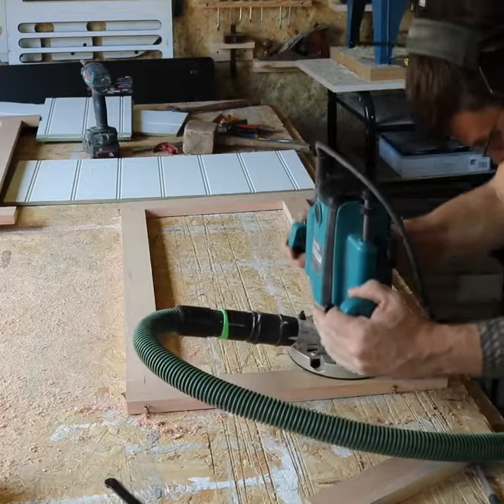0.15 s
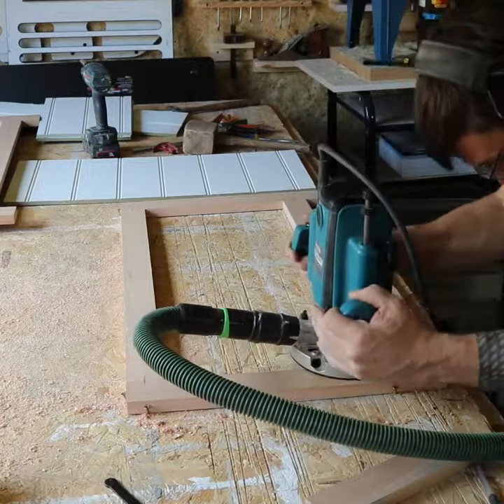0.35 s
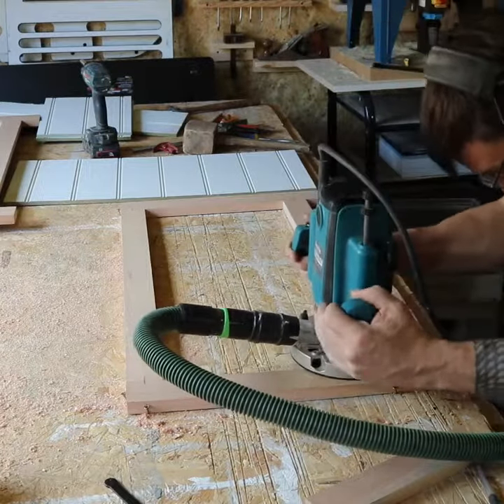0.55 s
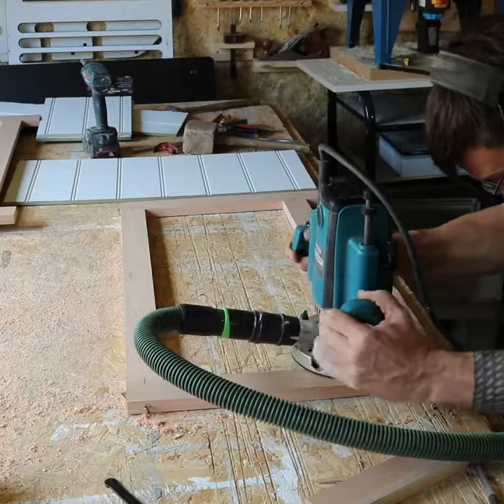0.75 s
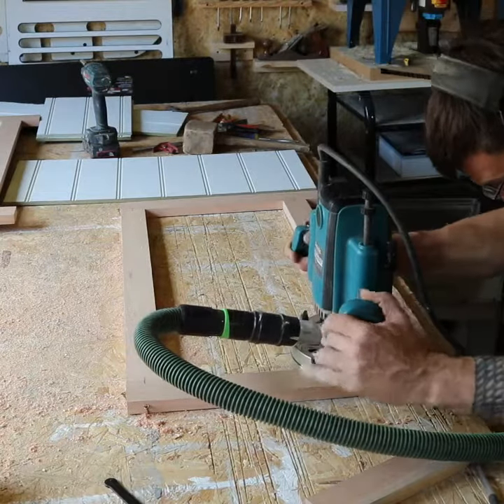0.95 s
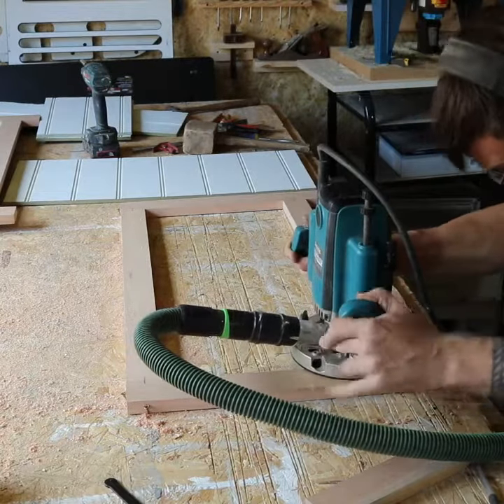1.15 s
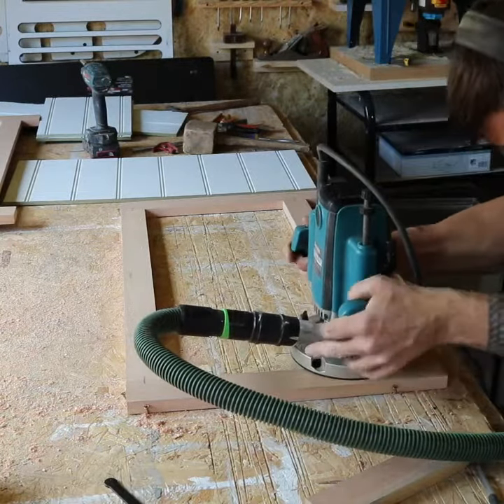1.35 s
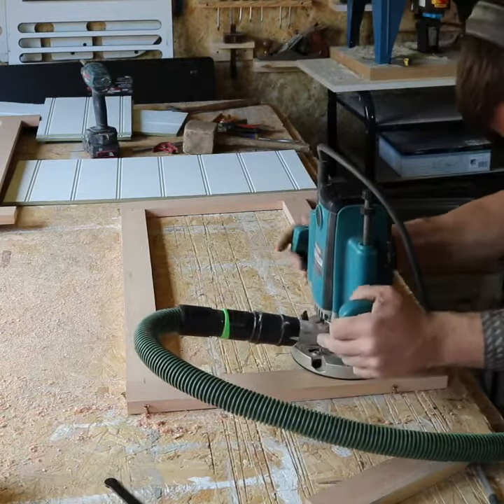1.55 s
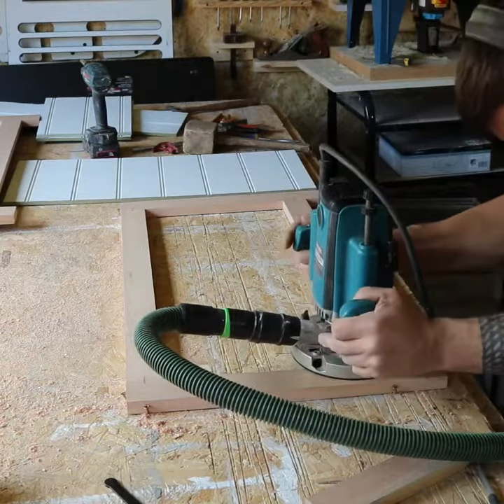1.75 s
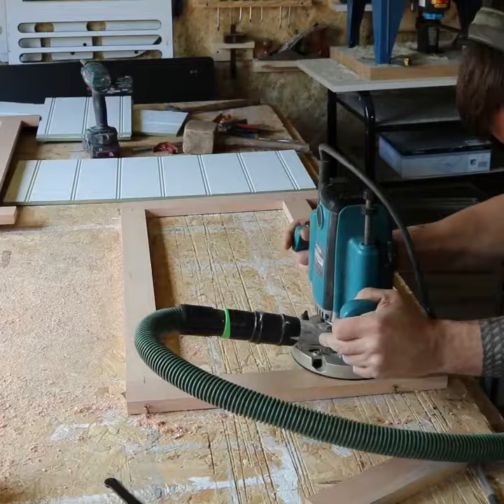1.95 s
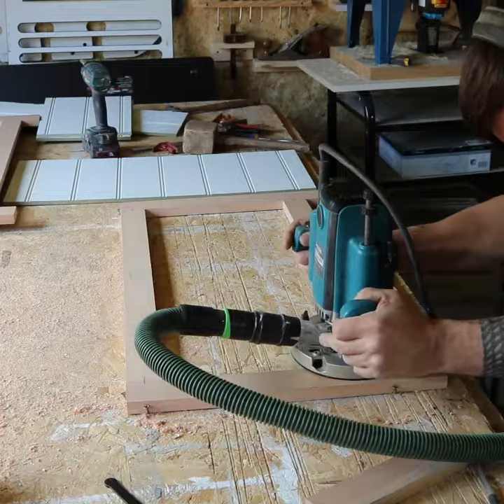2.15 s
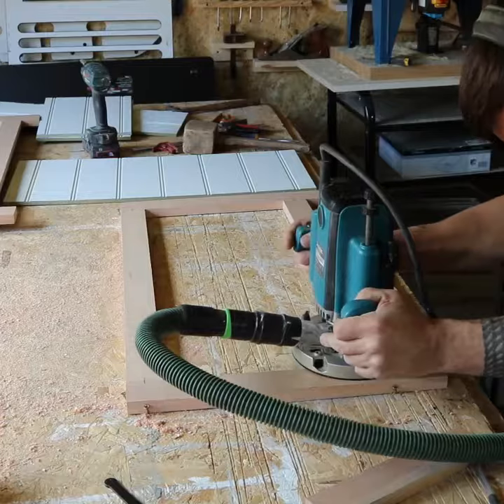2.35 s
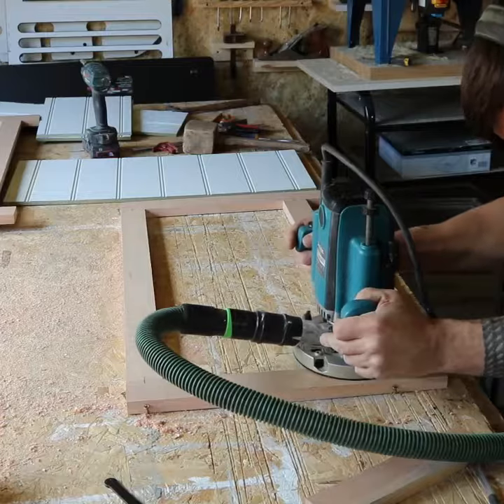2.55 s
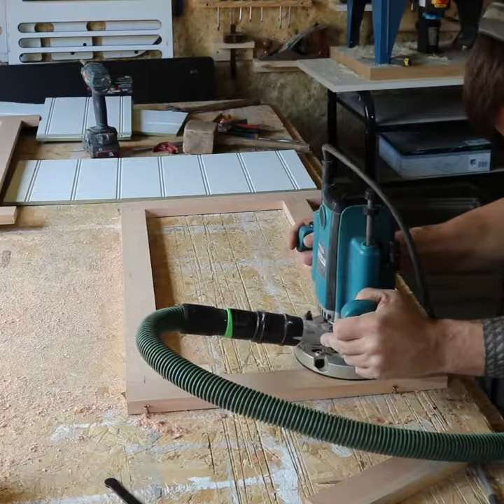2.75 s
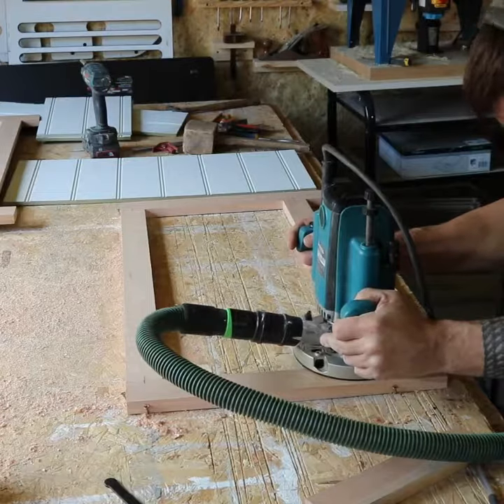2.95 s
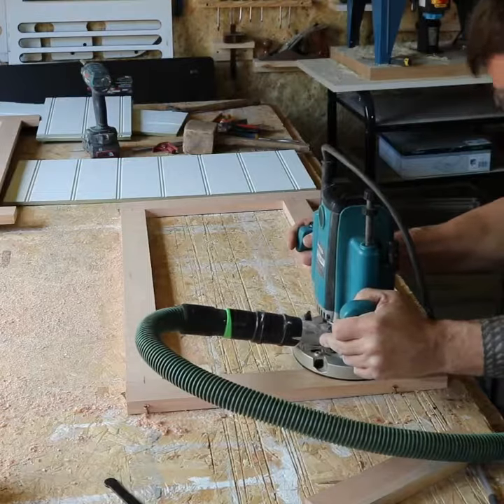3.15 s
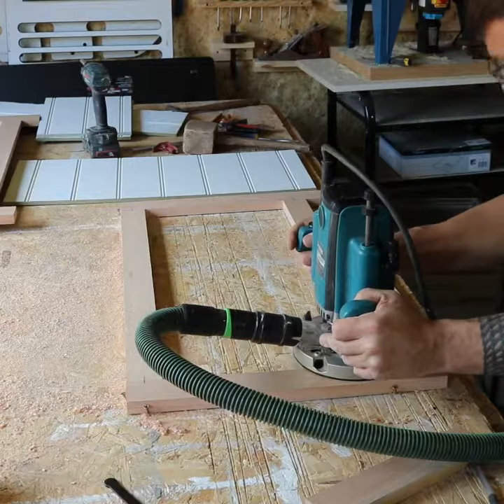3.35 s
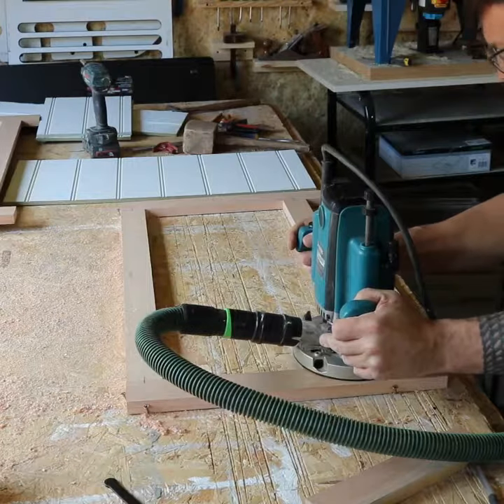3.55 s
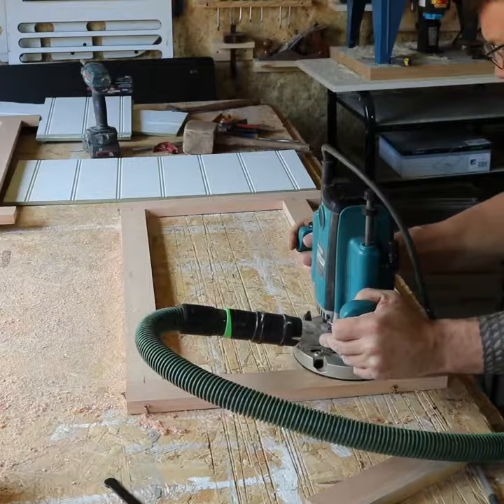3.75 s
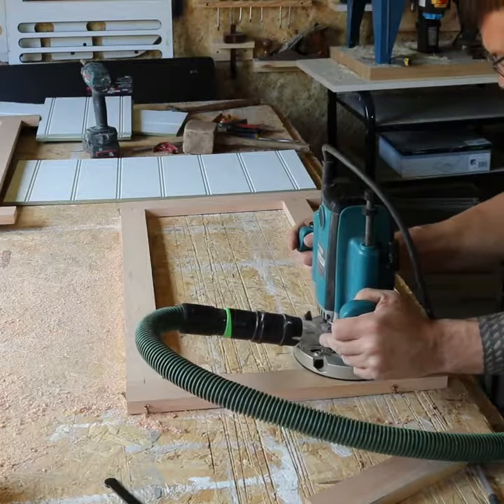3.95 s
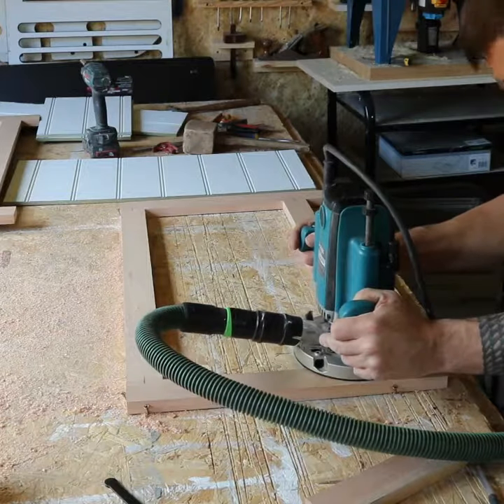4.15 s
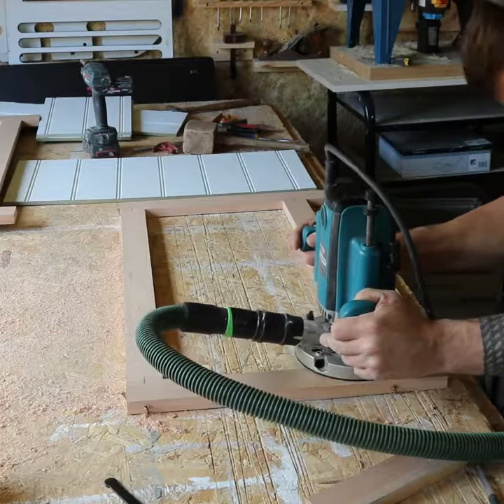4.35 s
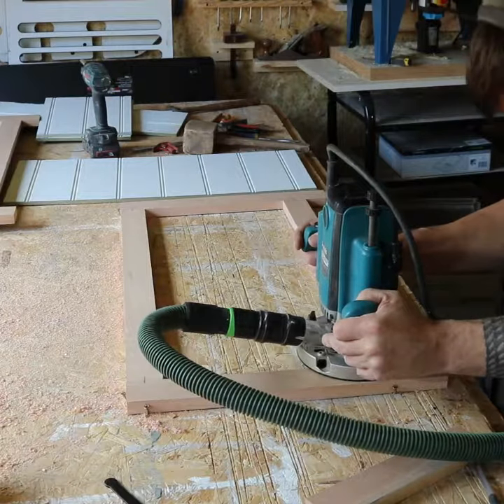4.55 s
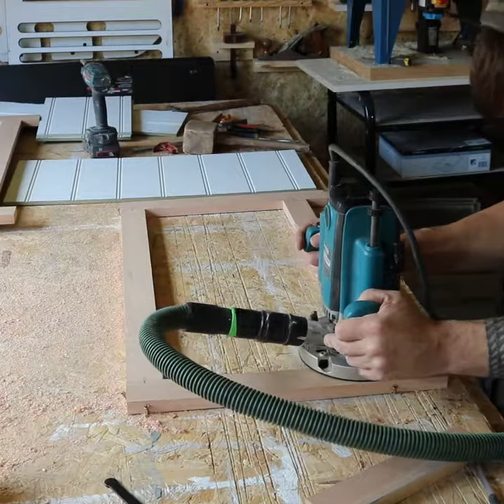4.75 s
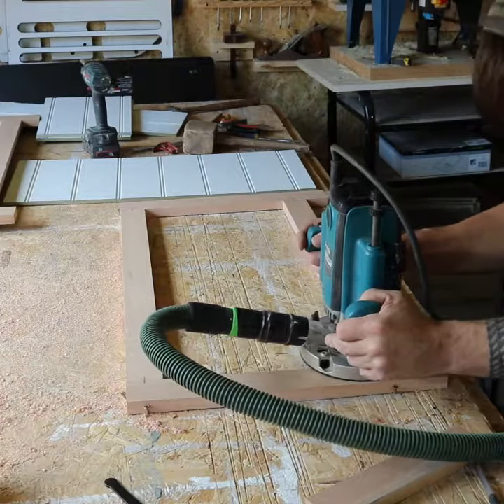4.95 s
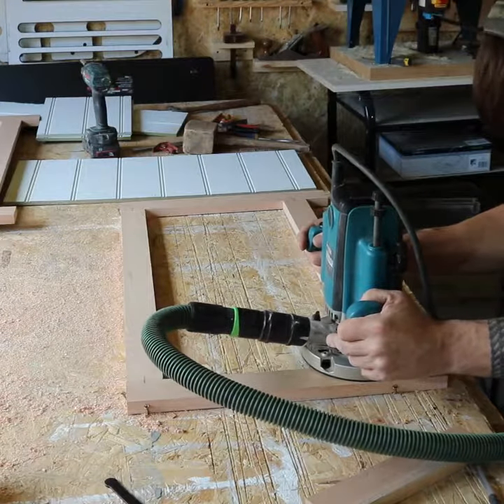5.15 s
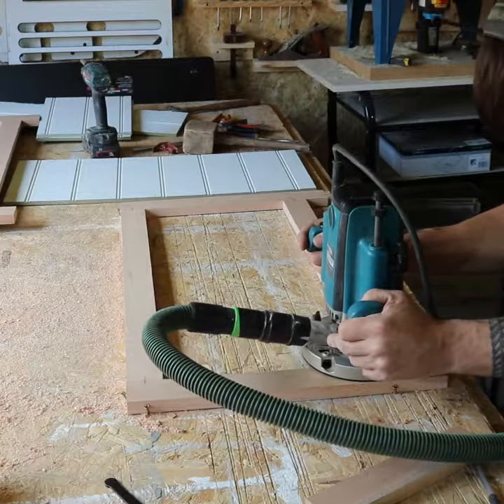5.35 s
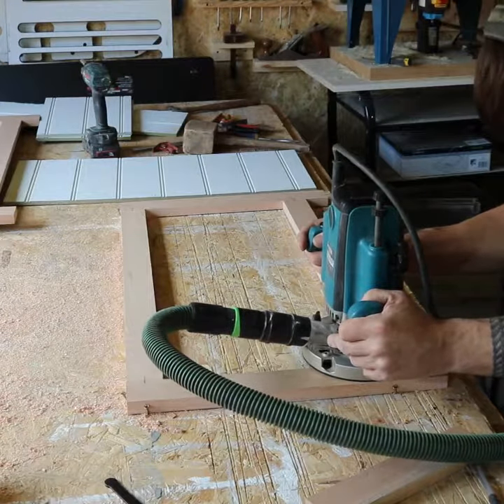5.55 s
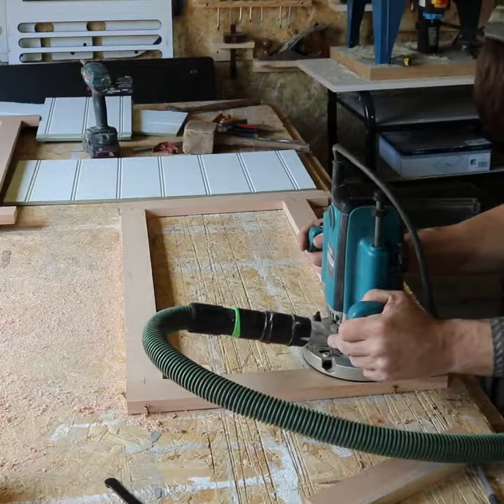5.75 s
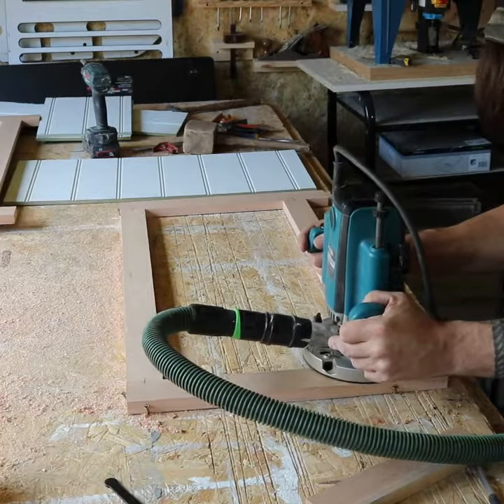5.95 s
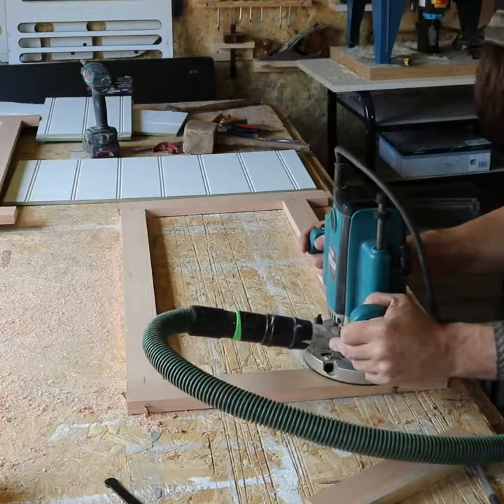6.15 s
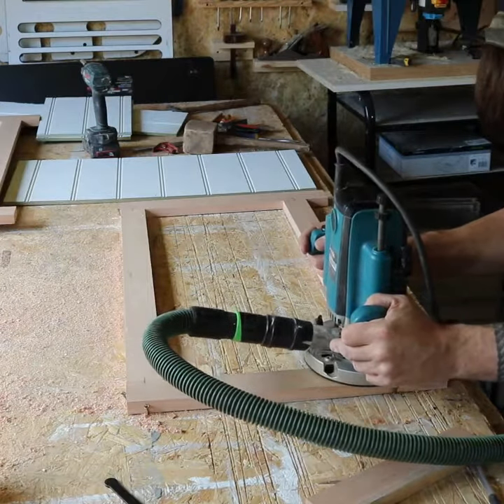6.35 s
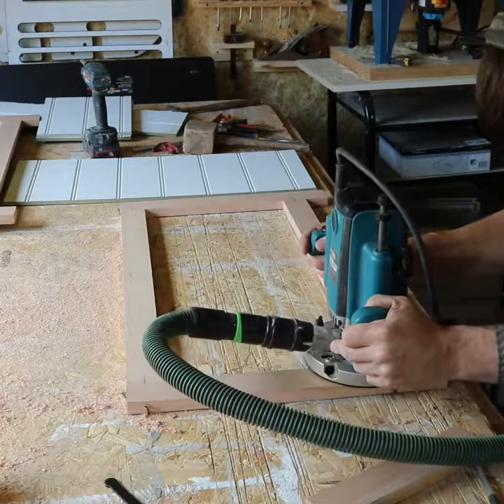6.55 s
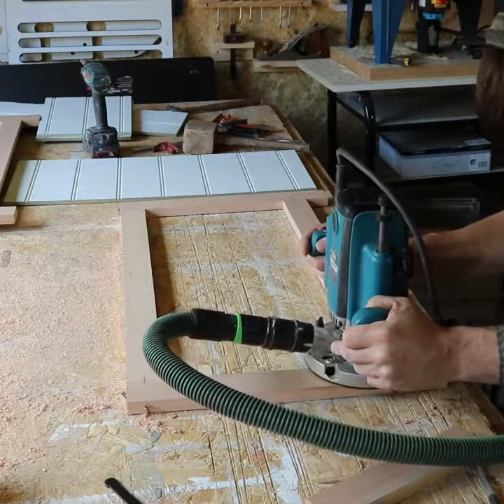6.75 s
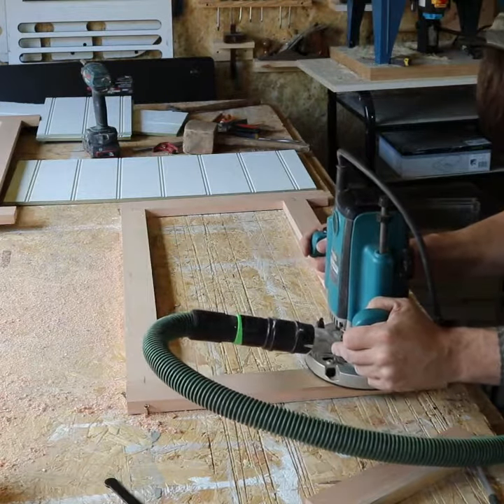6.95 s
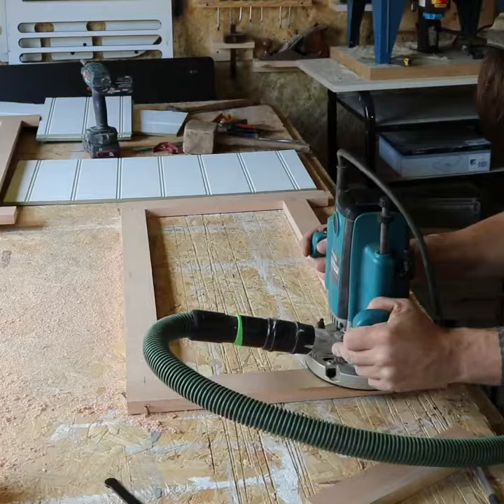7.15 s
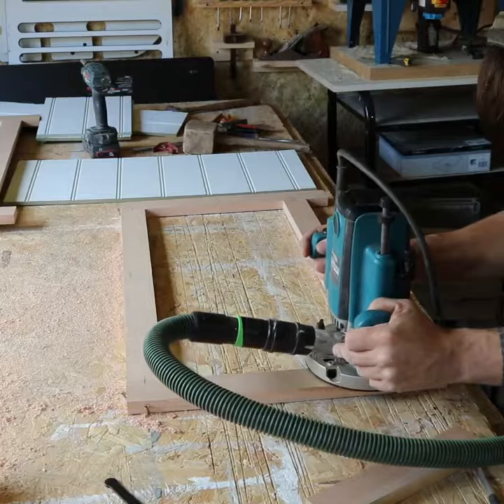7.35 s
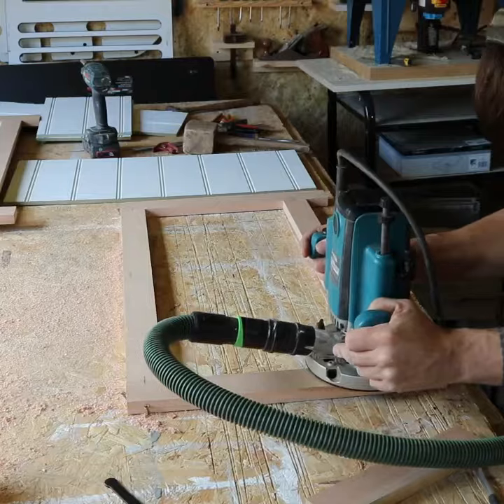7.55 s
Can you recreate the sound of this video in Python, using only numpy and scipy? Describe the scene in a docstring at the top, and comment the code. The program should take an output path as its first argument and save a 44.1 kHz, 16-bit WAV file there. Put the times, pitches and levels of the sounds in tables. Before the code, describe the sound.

A few scrapes and knocks on wood, then a router starts, spins up to a loud high whine and cuts wood.

```python
"""Scrapes and knocks come first: a plunge router is slid into place on a wooden frame in a small workshop.
Switched on, the stalled motor buzzes with the mains, then its fan siren sweeps upward until the shaft
settles near 400 turns a second. Air rushes loudly through the housing, and shaft harmonics swell and
fade as the cutter works along the wood. Behind it, a dust extractor on the hose winds up."""
import sys
import numpy as np
from scipy import signal
from scipy.fft import rfft, irfft
from scipy.io import wavfile

SR = 44100
rng = np.random.default_rng(int(sys.argv[2]) if len(sys.argv) > 2 else 0)


def dump(signal):
    """Clip the signal to [-1, 1] and save it as 16-bit WAV at the path in sys.argv[1]."""
    limited = np.clip(np.atleast_2d(signal).T, -1, 1)
    pcm = np.round(limited * 32767).astype(np.int16)
    wavfile.write(sys.argv[1], SR, pcm)


N = 338688
TIME, HZ = np.arange(N) / SR, np.fft.rfftfreq(N, 1 / SR)
SWITCH_ON_S, MAINS_PULSE_HZ = 1.776, 100


def amp(db):
    """Decibels to gain."""
    return 10 ** (np.asarray(db) / 20)


def unit(x):
    """Scales to rms 1."""
    return x / np.sqrt(np.mean(x ** 2) + 1e-20)


def curve(points, hz=HZ):
    """Joins (f, value) points by straight lines over log frequency."""
    f, value = np.transpose(points)
    return np.interp(np.log(hz + 1), np.log(f + 1), value)


def bells(resonances, at=HZ):
    """Bell EQ in dB from (f, width, boost) resonances."""
    return sum(db / (1 + (2 * (at - hz) / width) ** 2) for hz, width, db in resonances)


def band(low_hz, high_hz):
    """Gain of a steep band-pass."""
    return 1 / np.sqrt((1 + (low_hz / (HZ + 1)) ** 12) * (1 + (HZ / high_hz) ** 12))


def noise(gain):
    """Noise of rms 1, coloured by a gain over frequency."""
    return unit(irfft(rfft(rng.standard_normal(N)) * gain, N))


def drift(rate_hz):
    """Random wander of rms 1, mostly slower than rate_hz."""
    return noise(1 / (1 + (HZ / rate_hz) ** 2))


def held(start, end, attack_s, release_s):
    """Envelope that rises from the start and dies away after the end."""
    attack = 1 - np.exp(-np.maximum(TIME - start, 0) / attack_s)
    return attack * np.exp(-np.maximum(TIME - end, 0) / release_s)


# reverb decay of the shop: f/Hz, t60/s
ROOM_DECAY = [(100, 0.31), (400, 0.25), (1500, 0.26), (4000, 0.22), (10000, 0.2)]
def workshop(dry, wet_db):
    """Direct sound plus dense reflections; the treble dies first."""
    taps = rng.standard_normal(SR // 2) * (np.arange(SR // 2) > .003 * SR)
    hz, t, spectra = signal.stft(taps, SR, nperseg=256)
    tail = signal.istft(spectra * amp(-60 * t / curve(ROOM_DECAY, hz)[:, None]), SR, nperseg=256)[1]
    wet = signal.fftconvolve(dry, tail / np.linalg.norm(tail))[:N]
    return (dry + amp(wet_db) * wet) / np.hypot(1, amp(wet_db))


# EQ of the background bed: f/Hz, level/dB
ROOM_EQ = [(15, -40), (40, -40), (100, -2), (180, -0.5), (350, -3.5), (800, -8.5), (2000, -13), (5000, -18),
           (10000, -22), (16000, -30)]
def room_tone(mains):
    """A quiet, dark bed of noise with a trace of mains hum."""
    return amp(-53.5) * noise(amp(curve(ROOM_EQ)) * band(74, 20000)) + amp(-69.5) * mains


def extractor(start_s=2.2, wind_up_s=1.08, top_hz=637, level_db=-46):
    """The suction motor winds up slowly: a faint, wavering note that grows with its speed."""
    share = np.tanh(np.maximum(TIME - start_s, 0) / wind_up_s)
    phase = 2 * np.pi * np.cumsum(top_hz * share) / SR + 0.68 * drift(15)
    return np.sqrt(2) * share * amp(level_db + 3.1 * drift(12)) * np.cos(phase)


# EQs of the scrape and of its hiss: f/Hz, level/dB
SCRAPE_EQ = [(25, -35), (60, -27), (160, -2), (320, -2.5), (600, -2.5), (1200, -4.5), (2400, -3.5),
             (2900, -10.5), (3500, -9), (4200, -16), (7000, -40)]
HISS_EQ = [(1500, -8.5), (3800, -1), (6500, -6), (10000, -10.5), (12000, -17), (16000, -26)]
# shoves over the wood: centre t/s, half length/s, then relative level/dB of scrape, hiss and rumble
SHOVES = [(.005, 0.041, -38.5, -43, -56), (0.099, 0.067, -35, -47.5, -40.5), (0.208, 0.12, -40.5, -50, -46),
          (0.314, .05, -52, -50, -44), (.45, 0.15, -47, -60, -60), (0.676, 0.07, -60, -55.5, -60),
          (.75, .06, -52, -62, -66), (1.08, 0.32, -72, -66, -61), (1.334, 0.11, -59, -59.5, -70),
          (1.47, 0.058, -43, -58, -66), (1.562, 0.052, -37, -40, -66), (1.645, 0.049, -31.5, -31, -65),
          (1.72, 0.057, -38, -47, -63)]
def slides(grain_db=1.5):
    """The base plate catches and slips on the grain and shakes the bench; each shove swells and fades."""
    power = sum(np.outer(amp(dbs), np.exp(-((TIME - s) / half) ** 2)) ** 2 for s, half, *dbs in SHOVES)
    rub, hiss, rumble = np.sqrt(power)
    grip = unit(amp(grain_db * drift(150)))
    scrape = rub * noise(amp(curve(SCRAPE_EQ))) + amp(4) * hiss * noise(amp(curve(HISS_EQ)))
    judder = noise(band(45, 400) / (1 + ((HZ - 78) / 14) ** 2))
    return grip * scrape + rumble * judder


# EQ shared by all knocks: f/Hz, level/dB
KNOCK_EQ = [(30, -8), (75, -13.5), (130, -8.5), (290, 0.5), (800, 2.5), (1800, 0.5), (3000, 3), (4600, -4),
            (6000, -12), (10400, -14.5), (11500, -27), (16000, -33)]
# modes of tool and bench: f/Hz, nominal ring/s, boost/dB
BODY_MODES = [(76, .3, -1), (150, .2, 9.5), (296, 0.17, 1), (574, 0.13, 3), (616, 0.17, 0),
              (2520, 0.018, 1.5), (3250, 0.01, -0.5), (3800, .025, 2), (4550, .02, -2)]
# hits of base, lock and switch: t/s, relative level/dB, bass/dB, treble/dB, contact/s, ring f/Hz
HITS = [(0.264, -23, -11, 3, 0.0013, 4400), (0.2676, -23, 6.5, 6.5, 0.003, 280),
        (.418, -40, 9, -7, 0.0076, 1400), (0.4908, -34.5, 5, -30, 0.0051, 835),
        (.708, -41.5, 8, -11, 0.0067, 1500), (0.785, -47, 15, 5, 0.0038, 503),
        (1.178, -54, 12, 5, 0.0052, 250), (1.418, -28.5, 1, -15, 0.0046, 1100),
        (1.441, -38.5, 7, -23, .008, 2700), (1.714, -21.5, -20, 1, 0.0015, 2980),
        (1.719, -38, -6, 2, 0.0055, 3000), (1.775, -29, 1, -2, 0.0032, 2200)]
def knocks(bass_hz=600, treble_hz=3400, ring_db=6, ring_width=0.12):
    """Each contact is a short rattle that rings the struck part, the tool and the bench."""
    blows = np.zeros(N)
    t, hz = np.arange(4096) / SR, np.fft.rfftfreq(4096, 1 / SR)
    for s, db, bass_db, treble_db, contact_s, ring_hz in HITS:
        shelves = bass_db / (1 + (hz / bass_hz) ** 2) + treble_db / (1 + (treble_hz / (hz + 1)) ** 4)
        ring = ring_db / (1 + ((hz / ring_hz - 1) / ring_width) ** 2)
        pressure = t / contact_s * np.exp(1 - t / contact_s)
        rattle = irfft(rfft(rng.standard_normal(len(t))) * amp(shelves + ring))
        blows[round(s * SR):][:len(t)] += amp(db) * pressure * rattle
    body_db = curve(KNOCK_EQ) + bells([(f, 6 / ring_s, db) for f, ring_s, db in BODY_MODES])
    log_gain = np.log(unit(amp(body_db)))
    # minimum phase, so the ring follows the blow
    phase = -signal.hilbert(np.r_[log_gain, log_gain[-2:0:-1]]).imag[:len(HZ)]
    ringing = irfft(rfft(blows) * np.exp(log_gain + 1j * phase), N)
    return amp(2.5) * workshop(ringing, wet_db=-1.0)


# shaft speed, running up from rest and sagging in heavy cuts: t/s, speed/(turns/s)
SHAFT_SPEED = [(1.775, 2), (2.05, 110), (2.19, 165), (2.3, 240), (2.4, 279), (2.7, 344), (2.82, 356),
               (3.1, 372), (3.35, 386.5), (3.7, 395.3), (4.3, 403.7), (4.9, 407.6), (5.33, 397),
               (5.8, 398.4), (7, 395.8), (7.4, 388), (7.68, 391)]
# current surges of the run-up: start t/s, end t/s, level/dB, attack/s, release/s
INRUSH = [(1.778, 2.045, 0, 0.014, 0.05), (2.146, 2.35, -6, 0.058, 0.05)]
def motor(running_db=-30):
    """Speed, shaft angle and relative current: the controls for the router's layers."""
    speed = np.interp(TIME, *np.transpose(SHAFT_SPEED))
    angle = 2 * np.pi * np.cumsum(speed * (1 + 0.00029 * drift(9.8))) / SR
    surges = sum(amp(db) * held(start, end, attack, release) for start, end, db, attack, release in INRUSH)
    return speed, angle, amp(running_db) + surges


# partials of the buzz: multiple of the mains pulse, relative level/dB
BUZZ_PARTIALS = [(2, -19.5), (3, -0.5), (4, 1.5), (5, -7), (6, -3), (9, -7), (12, -1)]
def motor_buzz(current, mains, buzz_db=-30, hum_db=-44, fade_db_per_s=15.5):
    """The starting current makes the iron buzz and the brushes rasp, over a fading hum."""
    buzz = unit(sum(amp(db) * np.cos(2 * np.pi * (round(k) * MAINS_PULSE_HZ * TIME + rng.random()))
                    for k, db in BUZZ_PARTIALS))
    brushes = amp(3) * noise(1 / (1 + ((HZ - 2150) / 450) ** 2)) * (1 + 0.35 * mains)
    shudder = amp(-12.5) * noise(band(84, 400))
    hum = amp(hum_db - fade_db_per_s * np.maximum(TIME - SWITCH_ON_S, 0)) * mains
    return amp(buzz_db) * current * (buzz + brushes + shudder) + hum


# level ride along the siren's sweep: f/Hz, level/dB
SIREN_RIDE = [(300, -49), (800, -28.5), (1400, -32.5), (1620, -22), (1900, -16.5), (2130, -18),
              (2500, -21.5), (3800, -21.5), (4460, -37), (6200, -76)]
# grit while the rotor is slow: speed/(turns/s), share of rasp
SIREN_GRIT = [(140, .33), (180, 0)]
def fan_siren(speed, angle, mains, blades=16, throb=0.41, smear_rad=0.72, unevenness=0.46):
    """The fan blades sing a rising note, harsh at first, that throbs with the mains."""
    blade_phase = blades * angle + smear_rad * drift(125)
    rasp = np.cos(2 * blade_phase - .7 * drift(130)) + amp(-3) * np.cos(14 * angle + 1.5 * drift(130))
    siren = np.sqrt(2) * (np.cos(blade_phase) + np.interp(speed, *np.transpose(SIREN_GRIT)) * rasp)
    siren *= 1 + unevenness * np.cos(angle + drift(40))  # the blades are not quite alike
    siren *= amp(curve(SIREN_RIDE, blades * speed))
    return workshop(siren, wet_db=-5.0) * (1 + throb * mains)


# passes in the wood: start t/s, end t/s, drone level/dB, swell/s, squeal level/dB, squeal fade/(dB/s)
PASSES = [(4.84, 5.288, 3, 0.32, 1, 11), (5.432, 6.954, -10, 0.44, -3, 1), (6.94, 7.326, -0.5, .04, 1, 0),
          (7.334, 7.68, -20, 0.035, -3, 4)]
def cutting(bite_s=0.014, release_s=0.035):
    """Two envelopes: the cutter squeals as it bites, and drones as it sinks deeper."""
    drone = squeal = 0
    for start, end, drone_db, swell_s, squeal_db, fade in PASSES:
        elapsed = np.clip(TIME - start, 0, end - start)
        drone += amp(drone_db) * held(start, end, swell_s, release_s)
        squeal += amp(squeal_db - fade * elapsed) * held(start, end, bite_s, release_s)
    return drone, squeal


# free-running whine, and the two-edged cutter's drone and squeal: shaft multiple, relative level/dB
WHINE_PARTIALS = [(1, -47), (2, -45), (3, -45), (4, -44), (5, -37.5), (6, -42), (7, -40), (8, -50),
                  (9, -42), (10, -54), (11, -50), (14, -50), (15, -48), (16, -41.5), (17, -50)]
DRONE_PARTIALS = [(2, -32), (4, -38.5), (6, -33)]
SQUEAL_PARTIALS = [(6, -34.5), (8, -31.5), (10, -38), (12, -41), (18, -52), (20, -42), (22, -43), (24, -42),
                   (26, -48), (28, -52), (30, -54), (32, -50)]
# ride of the whine above its second harmonic: speed/(turns/s), level/dB
WHINE_RIDE = [(280, -6), (395, 0.5)]
# standing waves of room and housing that swell or dip a gliding harmonic: f/Hz, width/Hz, boost/dB
STANDING_WAVE_EQ = [(289, 20, 12), (322, 20, 12), (353, 16, 17), (374, 18, -9), (394.3, 31, 16),
                    (804, 53, 6), (1119, 24, 13.5), (1187.2, 29.6, 18.5), (1544, 14, 7), (1617, 42, 14),
                    (3260, 40, 3), (3968, 50, 9), (4130, 40, 12.5)]
def shaft(speed, angle, start_s=2.11, fade_in_s=0.21, sway_db=0.89, odd_damping=0.35):
    """Harmonics of the rotation; cutting adds even ones and damps the odd ones, the shaft's wobble."""
    drone, squeal = cutting()
    growth = amp(np.interp(speed, *np.transpose(WHINE_RIDE)))
    levels = {round(k): amp(db) * (growth if round(k) > 2 else 1) for k, db in WHINE_PARTIALS}
    for partials, load in ((DRONE_PARTIALS, drone), (SQUEAL_PARTIALS, squeal)):
        for k, db in partials:
            levels[round(k)] = np.hypot(levels.get(round(k), 0), amp(db) * load)
    whine = np.zeros(N)
    for k, level in levels.items():
        swell_db = bells(STANDING_WAVE_EQ, k * speed) + sway_db * np.sqrt(min(k, 20)) * drift(3.5)
        scatter = min(0.024 * k, .25) * drift(22)  # turbulent air blurs the higher harmonics more
        phase = k * angle + scatter + rng.uniform(0, 2 * np.pi)
        damping = 1 + odd_damping * (k % 2) * drone
        whine += level * amp(swell_db) / damping * np.cos(phase)
    return np.sqrt(2) * np.clip((TIME - start_s) / fade_in_s, 0, 1) * whine


# broad EQ of the rush: f/Hz, level/dB
AIR_EQ = [(70, -74), (150, -33), (230, -16), (330, -13), (520, -8.5), (900, -2.5), (2100, -0.7),
          (4100, -0.5), (6000, -2), (8000, -6.5), (10000, -8), (11200, -13), (13500, -16.5), (15500, -26)]
# resonances of the air path: f/Hz, width/Hz, boost/dB
HOUSING_MODES = [(292, 64, 6.5), (360, 14, 5.5), (466.4, 9.4, 10), (529, 48, 10), (631, 80, 8.5),
                 (726, 9.2, 8), (798, 20, 7.5), (1018, 14, 4.5), (1090, 40, 6), (1174, 14, 10),
                 (1768, 25, 3), (2060, 200, 3.5), (2390, 41, 7.5), (3054, 230, 2.5), (3384, 170, 4.5),
                 (3750, 22, 6.5), (4030, 71, 4), (4270, 19, 7), (5050, 56, 2.5), (5500, 39, 4),
                 (5570, 26, -4), (7160, 130, 1.5), (8680, 200, 3), (10960, 120, -3)]
# roar, body and hiss: low f/Hz, high f/Hz, settled level/dB, overshoot/dB, settling/s,
# rise/(dB per tenfold speed), brush rasp level/dB at full current
AIR_BANDS = [(20, 1410, -31.5, 6, 1.06, 21.5, -33), (1354, 4730, -22.5, 3, 1.6, 41, -21),
             (4390, 20000, -24.7, 2.5, 2.7, 27, -24.5)]
def air_rush(speed, angle, current, mains, full_flow_speed=268, settle_from_s=2.35, flutter=0.034):
    """Fan air rushes and hisses through the housing, growing with speed; the brushes rasp with the current."""
    colour = amp(curve(AIR_EQ) + bells(HOUSING_MODES))
    flow_decades = np.log10(np.minimum(speed / full_flow_speed, 1))
    rasp = current * np.minimum(speed / 80, 1)  # levels off at 80 turns a second
    elapsed = np.maximum(TIME - settle_from_s, 0)
    rush = np.zeros(N)
    for low_hz, high_hz, db, overshoot_db, settle_s, rise_db, rasp_db in AIR_BANDS:
        fan = amp(db + rise_db * flow_decades + overshoot_db * np.exp(-elapsed / settle_s))
        rush += np.hypot(fan, amp(rasp_db) * rasp) * noise(colour * band(low_hz, high_hz))
    pulsing = (1 + flutter * np.cos(angle)) * (1 + 0.023 * mains)
    return workshop(rush * pulsing, wet_db=-13.5)


def scene():
    """Handling, then the motors, over the room tone; the same mix in both channels."""
    speed, angle, current = motor()
    mains = np.cos(2 * np.pi * MAINS_PULSE_HZ * TIME)
    switched_on = np.clip((TIME - SWITCH_ON_S) / 0.0085, 0, 1)
    router = air_rush(speed, angle, current, mains) + shaft(speed, angle)
    router += motor_buzz(current, mains) + fan_siren(speed, angle, mains)
    mix = room_tone(mains) + switched_on * (extractor() + router) + knocks() + slides()
    return np.tile(mix, (2, 1))


def record(dry, cutoff_hz=15750):
    """A steep low-pass trims the very top."""
    low_pass = signal.firwin(511, cutoff_hz, window=("kaiser", 9), fs=SR)
    return signal.oaconvolve(dry, low_pass[None], "same")


dry = scene()
out = record(dry)
dump(out)
```